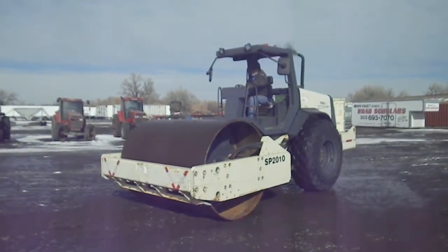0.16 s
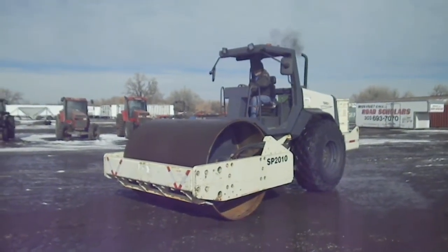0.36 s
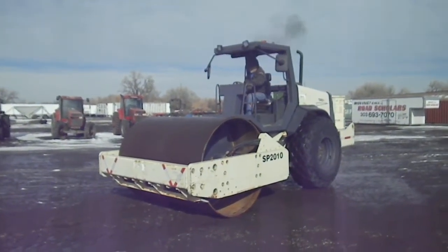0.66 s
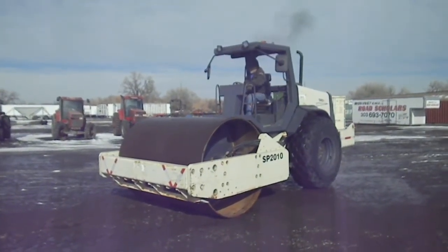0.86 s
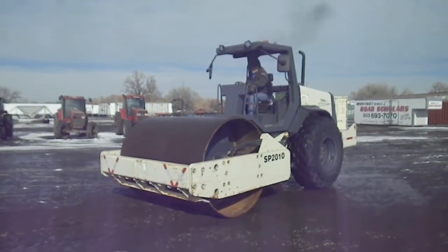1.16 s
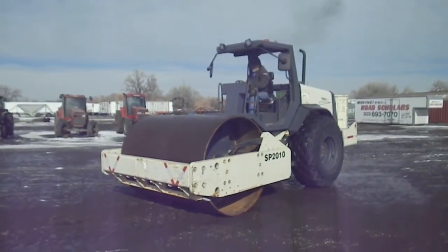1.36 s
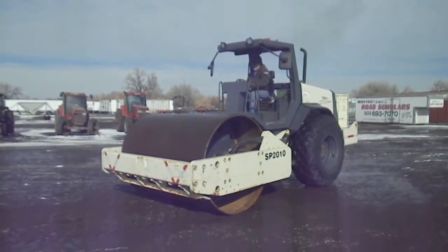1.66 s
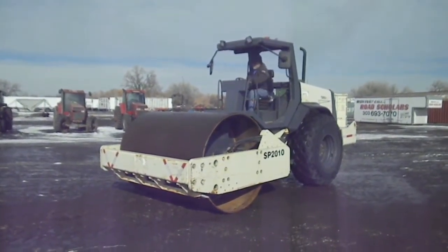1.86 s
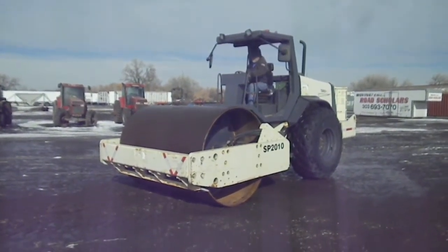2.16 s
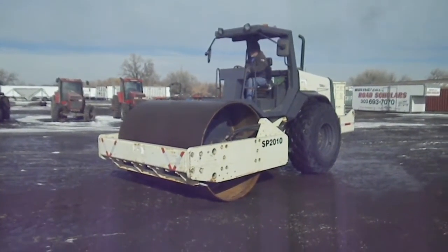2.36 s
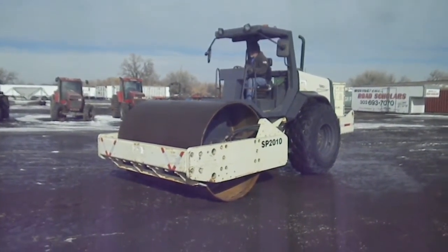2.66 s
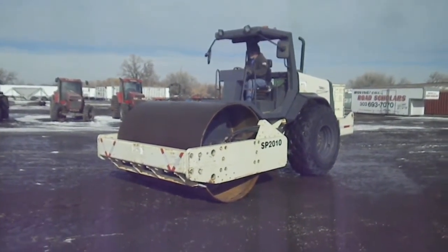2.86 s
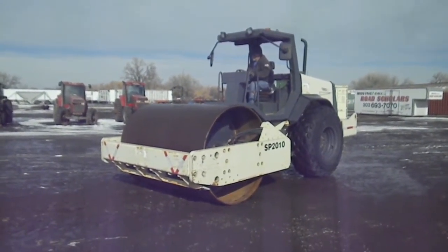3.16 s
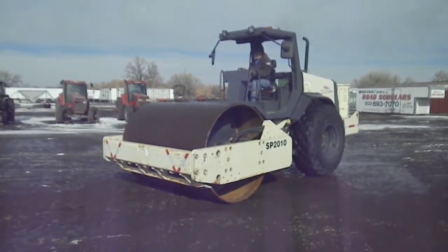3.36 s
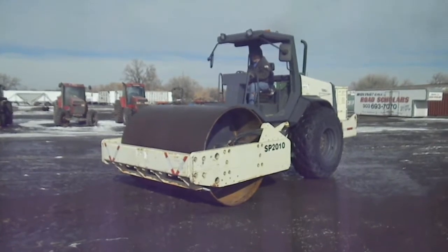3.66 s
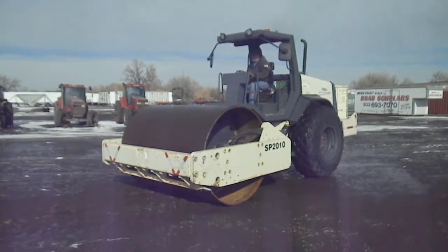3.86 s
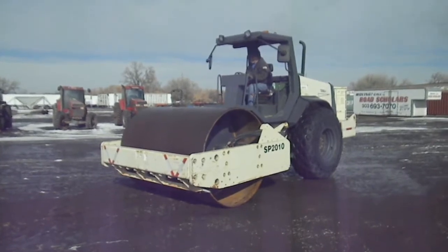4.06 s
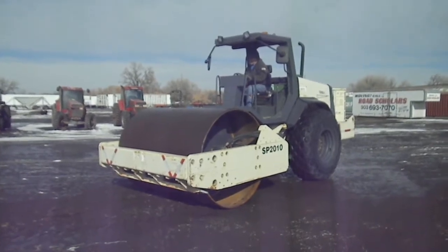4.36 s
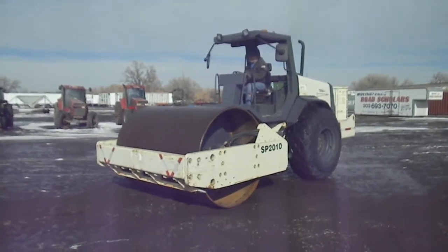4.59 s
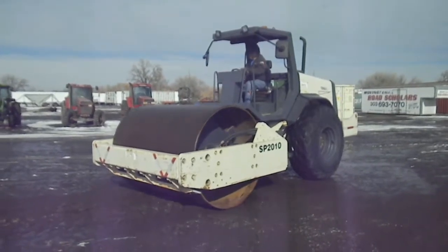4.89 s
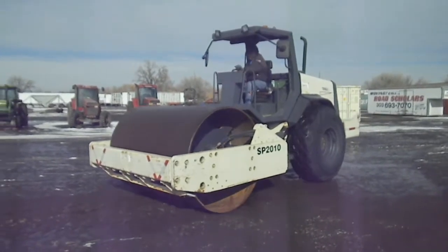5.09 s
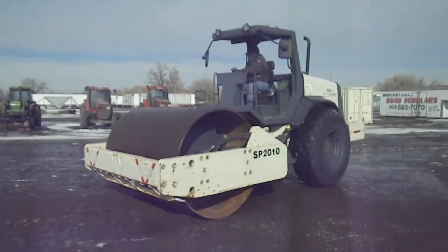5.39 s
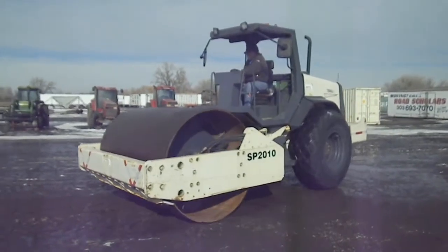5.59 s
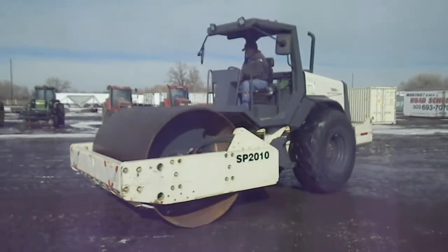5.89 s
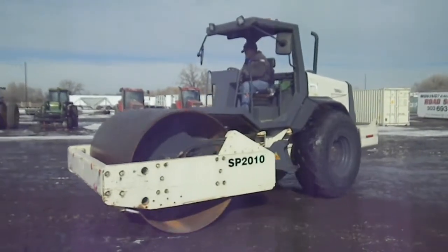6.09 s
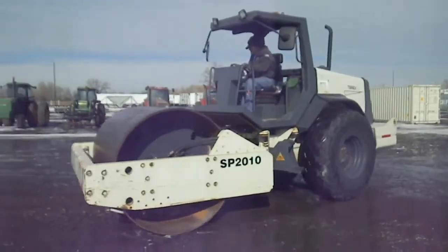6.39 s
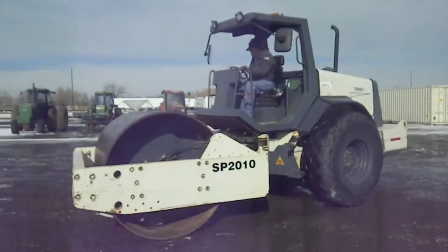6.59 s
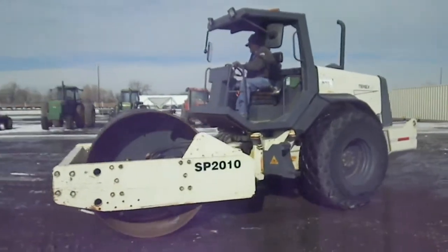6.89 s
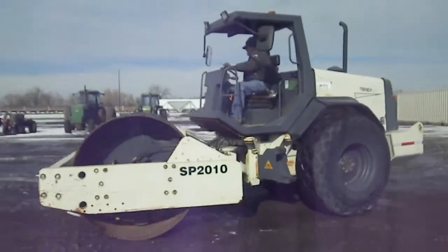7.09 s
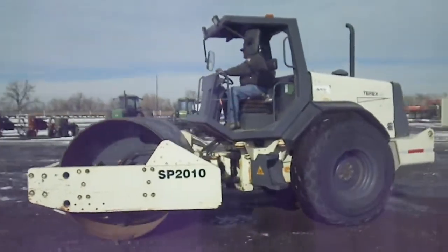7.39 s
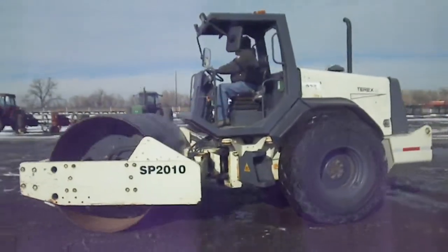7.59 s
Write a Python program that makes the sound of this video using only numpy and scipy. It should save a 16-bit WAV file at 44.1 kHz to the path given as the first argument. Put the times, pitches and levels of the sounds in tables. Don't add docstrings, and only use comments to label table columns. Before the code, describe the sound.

In the first 0.3 seconds a cold diesel road roller stutters quickly, knocking and rattling as it catches and speeds up. From 0.4 to 2.5 s it holds a quieter, clattering idle with thin high whines, a faint pump hum and soft wind puffs. At about 2.54 s the throttle opens with a sharp knock; uneven metallic knocks, rattles and small pings continue to about 3.5 s while engine pitch nearly triples. One tiny click falls near 3.55 s. By 3.9 s it runs at a steady, loud, ringing roar with intake rush, fan and exhaust hum. Around 4.6 s the drive takes the load: the hum swells and gears whine briefly. Until 7.5 s the roar holds, wavering slightly, with singing panels, fluttering fan tone and gravelly drum rumble, strongest around 6 to 6.6 s. Open lot, close thin camera microphone, bright edge, little bass.

```python
import sys
import numpy as np
from scipy import signal
from scipy.fft import rfft, irfft, next_fast_len
from scipy.io import wavfile
from scipy.ndimage import uniform_filter1d, map_coordinates

SR = 44100
rng = np.random.default_rng(int(sys.argv[2]) if len(sys.argv) > 2 else 0)


def master(y):
    cut = np.clip(np.atleast_2d(y).T, -1, 1)
    pcm = np.round(cut * 32767)
    wavfile.write(sys.argv[1], SR, pcm.astype(np.int16))


def attenuation_scalar(level_db):
    decades = np.asarray(level_db, float) / 20
    return 10 ** decades


N = 341334
T = np.arange(N) / SR

CAUGHT_S, THROTTLE_S = .225, 2.538
PULL_S, PULL_TAKES_S = 4.62, 0.34


def unit(x):
    return x / np.sqrt(np.mean(x ** 2) + 1e-20)


def along(points, hz):
    f, v = np.transpose(points)
    return np.interp(np.log(hz + 1), np.log(f + 1), v)


def curves(rows):
    s, *columns = np.transpose(rows)
    return [np.interp(T, s, column) for column in columns]


def swell(s, half_s):
    return np.exp(-((T - s) / half_s) ** 2)


def wobble(rate):
    s = np.arange(0, N + 64, 64) / SR
    points = rng.standard_normal(int(N * rate / SR) + 9)
    return np.interp(T, s, map_coordinates(points, [s * rate]))


def filtered(x, response):
    m = next_fast_len(N + 8192)
    hz = np.fft.rfftfreq(m, 1 / SR)
    return irfft(rfft(x, m) * response(hz), m)[..., :N]


def coloured(x, spectrum):
    return unit(filtered(x, lambda hz: attenuation_scalar(along(spectrum, hz))))


def patchy(depth_db):
    z = signal.stft(rng.standard_normal(N), nperseg=512)[2]
    field = uniform_filter1d(rng.standard_normal(z.shape), size=6, axis=0)
    field = uniform_filter1d(field, size=14, axis=1)
    return unit(signal.istft(z * attenuation_scalar(depth_db * unit(field)), nperseg=512)[1][:N])


def tone(turns, db, unsteady_db=.8, rate=7):
    return np.sqrt(2) * attenuation_scalar(db + unsteady_db * wobble(rate)) * np.sin(2 * np.pi * turns)


def bursts(rows, t60):
    hits, t = np.zeros(N), np.arange(SR // 8) / SR
    for s, db in rows:
        hits[round(s * SR)] = attenuation_scalar(db)
    rise = 1 - np.exp(-t / .0016)
    return signal.fftconvolve(hits, attenuation_scalar(-60 * t / t60) * rise)[:N]


# (time [s], fan blades passing [Hz], effort [dB])
ENGINE_RUN = [(0, 48.3, 4), (.12, 64.55, 6), (.3, 82.5, 0), (2.45, 83.27, 0), (2.7, 109.5, -0.5),
              (3, 151.8, -0.5), (3.3, 186.9, 0.7), (3.75, 236.6, 1), (3.9, 243.2, -0.1), (4.05, 244.7, 0.5),
              (4.5, 238.4, 0.8), (5, 240.6, 0.04), (5.9, 241.5, 0.5), (6.15, 245.3, .2), (6.5, 244.1, 1.5),
              (6.8, 237.5, .5), (7.1, 241.2, 1), (7.5, 245.1, 0.8)]


def controls():
    throttle = np.clip((T - THROTTLE_S) / .004, 0, 1)
    turned = np.clip((T - 4.75) / 2.5, 0, 1)
    working_hz = 240
    return throttle, turned, 20 * np.log10(curves(ENGINE_RUN)[0] / working_hz)


def level(idle_db, throttle_db, side_on_db):
    throttle, turned, _ = controls()
    return idle_db + throttle_db * throttle + side_on_db * turned


def block_effort():
    return attenuation_scalar(curves(ENGINE_RUN)[1] - 4 * starting_fuel())


def starting_fuel():
    return np.clip((CAUGHT_S - T) / .05 + .5, 0, 1)


def beat_depth():
    cold_db = 2.2 * controls()[0] * np.exp(-np.abs(T - THROTTLE_S) / 0.18)
    return level(idle_db=0.97, throttle_db=-0.66, side_on_db=-.4) + cold_db


def strokes(firings, repeat, depth_db, count=180):
    cycle = firings / 6
    slot = (cycle % 1 * count).astype(int)
    paired = np.tile(rng.standard_normal(count // 3), 3)
    pattern = .8 * paired + .6 * rng.standard_normal(count)
    taps = pattern[slot] * (np.diff(slot, prepend=0) != 0)
    taps = taps / np.sqrt(np.abs(uniform_filter1d(taps ** 2, size=8192)) + 1e-9)
    number = firings.astype(int)
    cylinder_db = rng.normal(0, .3, 6)[number % 6]
    scatter_db = rng.normal(0, 0.63, number[-1] + 1)[number]
    beat = attenuation_scalar(depth_db * (-2 - 2 * (firings % 1) + cylinder_db + scatter_db))
    beat = beat / np.sqrt(np.abs(uniform_filter1d(beat ** 2, size=8192)))
    return beat * (np.sqrt(repeat) * taps + np.sqrt(1 - repeat) * patchy(depth_db=0.12))


# (frequency [Hz], level per Hz [dB])
IDLE_BLOCK = [(410, -28), (700, -12.5), (839, -15), (1070, 1), (1290, -2.5), (1950, -5), (2370, -3),
              (2470, -2), (2670, -6), (3780, -11.5), (4600, -21), (5980, -58), (10100, -120)]
# (frequency [Hz], level per Hz [dB])
WORKING_BLOCK = [(410, -32), (700, -10), (790, -15), (1060, -1), (1350, -0.5), (1680, -2.5), (1900, -4.5),
                 (2300, -1.5), (2700, -6), (3300, -6.5), (4600, -20.5), (5980, -32), (10100, -120)]


def combustion_knock(blade_hz, firings):
    throttle = controls()[0]
    fuel = throttle + starting_fuel()
    drive = strokes(firings, repeat=.28 * blade_hz / 240, depth_db=beat_depth())
    knock = fuel * coloured(drive, WORKING_BLOCK) + (1 - fuel) * coloured(drive, IDLE_BLOCK)
    kick_db = 2.6 * throttle * np.exp(-np.abs(T - THROTTLE_S) / .22)
    return attenuation_scalar(level(idle_db=-22, throttle_db=2.66, side_on_db=0.29) + kick_db) * knock


# (frequency [Hz], width [Hz], level [dB])
FREE_RING = [(2730, 500, 0)]
# (frequency [Hz], width [Hz], level [dB])
LOADED_RING = [(2370, 450, 0.1)]


def cylinder_ring(firings):
    gas = strokes(firings, repeat=.3, depth_db=1.3 * beat_depth())

    def ringing(modes):
        def response(f):
            return sum(attenuation_scalar(db) * (1j * f * width / (centre ** 2 - f * f + 1j * f * width)) ** 2
                       for centre, width, db in modes)
        return unit(filtered(gas, response))

    sag = 0.54 * swell(PULL_S + 0.045, .5 * PULL_TAKES_S)
    return np.sqrt(1 - sag) * ringing(FREE_RING) + np.sqrt(sag) * ringing(LOADED_RING)


def steady_ring(ring):
    return attenuation_scalar(level(idle_db=-44.5, throttle_db=22.47, side_on_db=-3) + 0.75 * wobble(22)) * ring


# (frequency [Hz], level per Hz [dB])
VALVE_TONE = [(2350, -23), (4000, -3.5), (7760, -21), (8300, -20), (10800, -57), (18300, -120)]


def valve_clatter(firings):
    clatter = coloured(strokes(firings, repeat=0.11, depth_db=1.3 * beat_depth()), VALVE_TONE)
    start_db = 3.9 * np.exp(-T / .35)
    clatter_db = level(idle_db=-40.5, throttle_db=2.27, side_on_db=.3) + start_db + 1.096 * wobble(12)
    return attenuation_scalar(clatter_db) * clatter


# (frequency [Hz], level per Hz [dB])
INTAKE_TONE = [(150, -46), (250, -26.5), (375, -10), (429, -6), (618, -0.5), (727, -6.5), (835, -1.5),
               (1000, -5), (1300, -9), (2200, -120)]


def intake_roar(firings):
    roar = coloured(strokes(firings, repeat=0.1, depth_db=2.0), INTAKE_TONE)
    return attenuation_scalar(level(idle_db=-33, throttle_db=1.76, side_on_db=1.35) + 0.27 * wobble(1.43)) * roar


# (frequency [Hz], level per Hz [dB])
RUMBLE_TONE = [(15, -55), (25, -46), (96, -18.5), (145, -3), (210, 1), (290, 4), (330, 2), (430, -3),
               (730, -120)]


def low_rumble():
    rumble = coloured(rng.standard_normal(N), RUMBLE_TONE)
    drum_db = 4.5 * (swell(5.9, 1.8) + .7 * swell(6.64, 0.21))
    rumble_db = level(idle_db=-47, throttle_db=0.56, side_on_db=-2.3) + drum_db + 1.6 * wobble(5)
    return attenuation_scalar(rumble_db) * rumble


# (level at working speed [dB], growth with speed [dB per dB], change when side on [dB])
FAN_TONES = [(-36, 4.5, -6.5), (-39, 4.5, -2)]
# (time [s], half length [s], level [dB])
COWL_FLUTTER = [
    (3.9, .09, 0),
    (4.265, 0.16, 4.5),
    (4.597, 0.18, 4.5),
    (5.003, 0.2, 3.5),
    (5.61, 0.22, 5.5),
    (6.4, 0.12, 5.5),
    (6.88, 0.2, 10.5),
]


def fan(blades):
    _, turned, speed_db = controls()
    flutter_db = sum(db * swell(s, half_s) for s, half_s, db in COWL_FLUTTER)
    blade_db, octave_db = [db + grows * speed_db + side_db * turned for db, grows, side_db in FAN_TONES]
    return tone(blades, blade_db, unsteady_db=2.5) + tone(2 * blades, octave_db + flutter_db)


EXHAUST_ORDERS = (.5, 1, 2, 3, 6)
# (level at working speed [dB], growth with speed [dB per dB],
# change when side on [dB], share of a load surge [0-1])
EXHAUST_LEVELS = [(-68, 6, -3, .05), (-55.5, 1.3, -3, .05), (-59.5, 1, 6, .6), (-52.5, 10, -20, .2),
                  (-49.5, 9, 5.5, 1)]
# (time [s], half length [s], level [dB])
LOAD_SURGES = [
    (4.6, 0.16, 19),
    (5.1, .15, 2.5),
    (5.9, 0.22, 7),
    (6.82, .15, -8),
    (7.55, 0.18, 3),
]


def exhaust(firings):
    _, turned, speed_db = controls()
    surge_db = sum(db * swell(s, half_s) for s, half_s, db in LOAD_SURGES)
    hum = np.zeros(N)
    for order, (db, grows, side_db, share) in zip(EXHAUST_ORDERS, EXHAUST_LEVELS):
        order_db = db + grows * speed_db + side_db * turned + share * surge_db
        hum += tone(order * firings, order_db, unsteady_db=1.4)
    return hum


# (time [s], peak level [dB])
COLD_RATTLES = [(.009, -25), (.052, -23), (.089, -23), (.124, -23.5), (.150, -24), (.178, -24), (.202, -25),
                (2.539, -28), (2.578, -27), (2.626, -29), (2.668, -26), (2.781, -27), (2.844, -29),
                (2.916, -28), (3.022, -29)]


def cold_rattle():
    return bursts(COLD_RATTLES, t60=.055) * attenuation_scalar(-4) * coloured(rng.standard_normal(N), VALVE_TONE)


# (time [s], peak level [dB])
COLD_KNOCKS = [(0.0343, -6.5), (0.0767, -6.5), (0.111, -8.5), (0.15, -6), (0.1754, -11), (0.1974, -17),
               (0.2393, -15), (0.2723, -15), (0.2966, -11.5), (0.4399, -17), (2.5416, -5), (2.5934, -25),
               (2.6374, -25), (2.6614, -30), (2.6794, -23), (2.7194, -10.5), (2.7584, -20), (2.791, -10),
               (2.8294, -8), (2.8456, -8.5), (2.9248, -15), (2.9394, -9.5), (3.0196, -7), (3.0372, -21),
               (3.124, -3.5), (3.2387, -10), (3.325, -12.5), (3.4165, -12), (3.4636, -12)]


def cold_knock(ring):
    thump = coloured(rng.standard_normal(N), WORKING_BLOCK) + .7 * ring
    return bursts(COLD_KNOCKS, t60=.11) * attenuation_scalar(-10) * thump


# (frequency [Hz], level [dB])
WHINES = [(37.7, -76), (430, -50), (586.8, -46), (624.5, -47), (2501, -32), (2918, -40)]
# (time [s], level [dB])
IDLE_LEVEL = [
    (.3, -30),
    (.42, -1),
    (2.5, -1),
    (2.7, -2),
    (2.8, -30),
]


def idle_whine():
    return attenuation_scalar(curves(IDLE_LEVEL)[0]) * sum(tone(hz * T, db, unsteady_db=1.1) for hz, db in WHINES)


# (time [s], level [dB])
PUMP_LEVEL = [
    (.3, -70),
    (.38, -47),
    (.7, -49),
    (.95, -56),
    (2.4, -57),
    (2.55, -75),
]


def pump():
    return tone(290.7 * T, curves(PUMP_LEVEL)[0])


# (time [s], peak level [dB], centre [Hz])
WIND_PUFFS = [(.37, -37, 255), (0.829, -37, 150.7), (.95, -31, 149.5), (0.991, -32, 189.8),
              (1.14, -36, 240), (1.19, -27, 239), (1.629, -24.5, 290), (1.77, -34, 290), (1.862, -30, 196),
              (2.151, -40, 112), (2.34, -35, 150), (2.47, -30, 153), (2.631, -26, 280), (3.488, -25, 300),
              (4.7, -35, 159), (5.1, -37, 170), (6.359, -30, 199.8), (6.41, -29, 259.2),
              (6.462, -41, 199.3), (6.54, -39, 180.6)]


def wind():
    out, t = np.zeros(N + SR), np.arange(-1500, 1500) / SR
    for s, db, hz in WIND_PUFFS:
        push = np.exp(-(t * hz / 0.76) ** 2) * np.sin(2 * np.pi * hz * t)
        out[round(s * SR) - len(t) // 2:][:len(t)] += attenuation_scalar(db) * push
    return out[:N]


# (time [s], peak level [dB], pitch [Hz])
LOOSE_PARTS = [(2.5377, -30, 5030), (2.5782, -32, 5270), (2.6267, -32, 4743), (2.6689, -25, 4800),
               (2.7817, -29, 4860), (2.8171, -31, 4905), (2.868, -34, 4870), (2.9132, -26, 4890),
               (3.3372, -30, 4850), (4.103, -33, 5324), (4.2132, -31, 4875), (4.5327, -32, 4856),
               (4.9095, -34, 4835), (5.3908, -34, 4756), (5.797, -34, 5037), (6.448, -26, 4790),
               (6.6498, -29, 4867), (6.6861, -33, 4853)]


def pings():
    out, t = np.zeros(N + SR), np.arange(SR // 20) / SR
    rise = 1 - np.exp(-t / .002)
    for s, db, hz in LOOSE_PARTS:
        fade = attenuation_scalar(db - 60 * t / 0.049)
        out[round(s * SR):][:len(t)] += fade * rise * np.sin(2 * np.pi * hz * t)
    return out[:N]


# (multiple of the firing rate, level [dB])
SINGING_ORDERS = [(9, -38), (9.5, -34), (10, -35), (10.5, -38), (12, -39), (13.5, -40), (14, -38),
                  (14.5, -40), (20.5, -37), (21, -37), (24, -40)]


def singing_panels(firings):
    _, turned, speed_db = controls()
    singing_db = 45 * np.minimum(speed_db + .2, 0) - 3 * turned + 2.5 * swell(6.5, 1.1)
    tones = sum(tone(order * firings, db, unsteady_db=0.7, rate=2.16) for order, db in SINGING_ORDERS)
    return attenuation_scalar(singing_db) * tones


def gear_whine(blades):
    gear_db = -33 - 28 * (1 - swell(PULL_S, PULL_TAKES_S) ** .3)
    return tone(10 * blades, gear_db)


def scene():
    blade_hz = curves(ENGINE_RUN)[0]
    blades = np.cumsum(blade_hz) / SR
    firings = blades / 2.194
    ring = cylinder_ring(firings)
    steady = combustion_knock(blade_hz, firings) + steady_ring(ring) + valve_clatter(firings)
    block = block_effort() * steady + cold_rattle() + cold_knock(ring)
    air = intake_roar(firings) + low_rumble()
    hum = fan(blades) + exhaust(firings) + idle_whine() + pump() + singing_panels(firings) + gear_whine(blades)
    return (block + air + hum + wind() + pings())[None]


# (frequency [Hz], level [dB])
MIRROR_LEVEL = [(8000, 0), (8350, -6), (8750, -13), (9500, -11), (10900, -27), (12400, -34), (13500, -41.5),
                (14900, -49), (15300, -51)]


def slow_camera(dry):
    camera_hz, low_cut_hz = 16000, 60
    base = filtered(dry, lambda hz: (hz < camera_hz / 2) * hz ** 2 / np.sqrt(hz ** 4 + low_cut_hz ** 4))
    image = 2 * base * np.cos(2 * np.pi * camera_hz * T)

    def mirror(hz):
        return attenuation_scalar(along(MIRROR_LEVEL, hz)) * (hz >= camera_hz / 2) * (hz < camera_hz)

    return base + filtered(image, mirror)


# (time [s], level [dB])
DROPPED_SAMPLE = [
    (3.546, -21),
]


def electronics(x):
    x = x + attenuation_scalar(-65) * rng.standard_normal(N)
    for s, db in DROPPED_SAMPLE:
        x[:, round(s * SR)] += attenuation_scalar(db)
    return x


def band_limit(x):
    return signal.sosfilt(signal.butter(12, 15650, fs=SR, output="sos"), x)


def record(dry):
    mix = electronics(slow_camera(dry))
    return band_limit(mix)


dry = scene()
out = record(dry)
master(out)
```